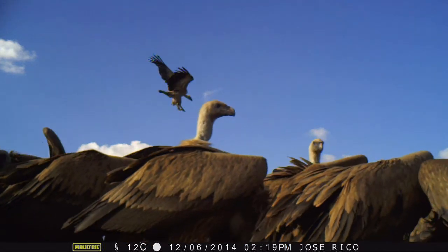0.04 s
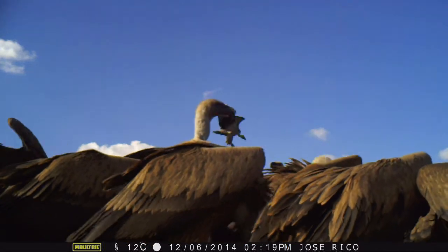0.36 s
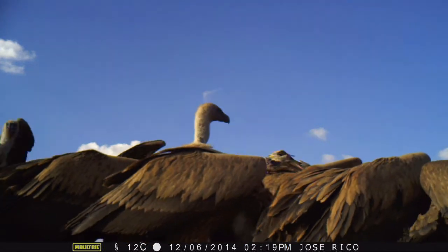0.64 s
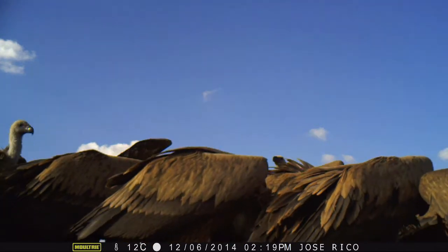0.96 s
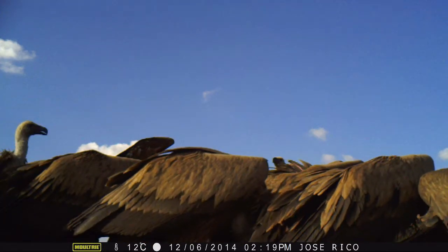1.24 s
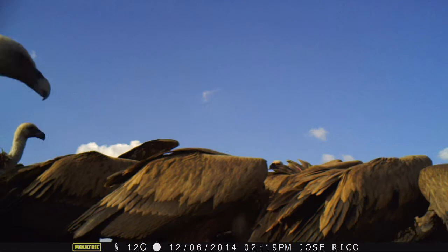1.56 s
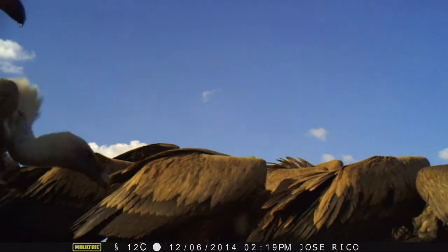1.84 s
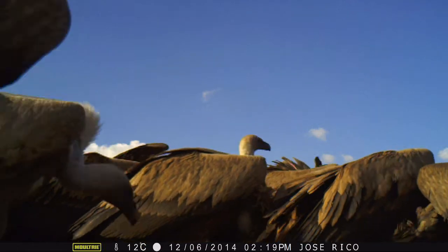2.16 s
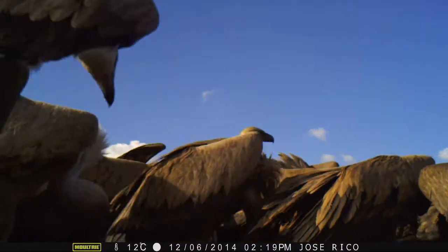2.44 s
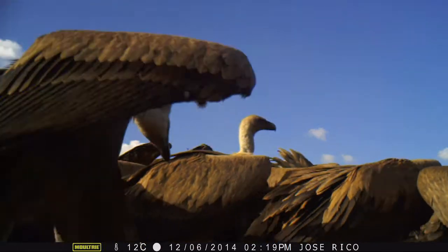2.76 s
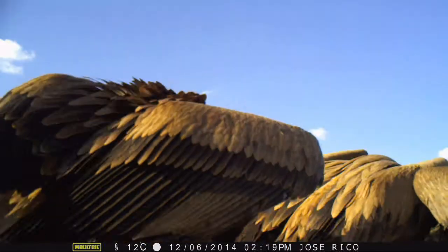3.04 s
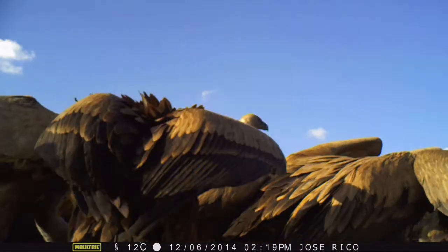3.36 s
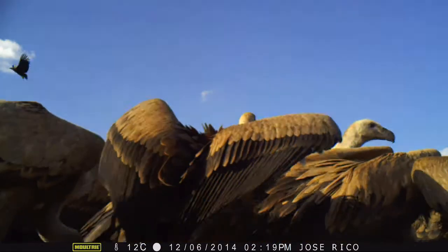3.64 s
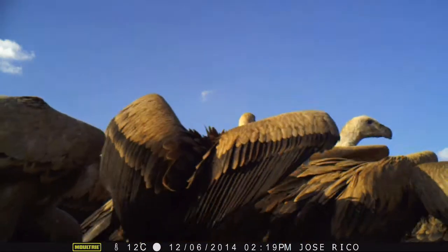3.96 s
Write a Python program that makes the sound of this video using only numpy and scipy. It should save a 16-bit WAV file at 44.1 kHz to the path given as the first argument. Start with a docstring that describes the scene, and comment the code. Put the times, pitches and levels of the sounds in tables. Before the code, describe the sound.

A vulture cackles harshly about ten times in quick succession, close to the microphone outdoors. Afterwards, jostling birds leave only faint feather rustles, scattered ticks, knocks and soft bumps over a low hiss and light wind.

```python
"""A vulture in a feeding crowd gives a quick run of ten harsh cackles close to a trail camera.
In each, a pulsing source drives the resonances of the throat: a short chip, a catch,
then a falling rasp that sometimes locks into a whistle. Afterwards the jostling is left:
feathers rustle by friction, quills tick, beaks and claws knock, and bodies bump.
Hiss and low wind lie under it all, and the camera's coarse sampling mirrors it into the treble."""
import sys
import numpy as np
from scipy import signal
from scipy.io import wavfile
from scipy.ndimage import uniform_filter1d, map_coordinates

SR = 44100
rng = np.random.default_rng(int(sys.argv[2]) if len(sys.argv) > 2 else 0)


def digitize_waveform(pressure):
    """Quantize a signal to 16-bit integers and store it at the path in sys.argv[1].

    Rows of a 2-D input are taken as channels; values are limited to [-1, 1].
    """
    field = np.atleast_2d(pressure).T
    bounded = np.clip(field, -1, 1)
    quanta = np.round(bounded * 32767).astype(np.int16)
    wavfile.write(sys.argv[1], SR, quanta)


N = 176400


def vulture():
    """Source and filter: each chip and rasp takes a fixed colour; the rasp yields partly to whistles."""
    # Calls: start_s, chip_s, chip_db, rasp_delay_s, rasp_s, rasp_db, throat_hz, pulse_hz
    cackles = [(-.016, 0.013, -11.5, 0.019, 0.032, -19, 1638, 281.4),
               (.057, 0.011, -16, 0.011, 0.034, -17, 1570, 286.3),
               (0.1357, 0.011, -14.5, 0.016, .035, -16, 1789, 331.5),
               (0.2136, .009, -13, 0.011, 0.038, -15, 1778, 295.2),
               (0.3015, 0.0064, -15, .0135, .03, -11, 1784, 317.4),
               (0.383, 0.0112, -14, .0155, 0.038, -20.5, 1678, 322),
               (0.4696, 0.0096, -14, .0145, 0.0288, -16.5, 1732, 316),
               (0.5566, 0.011, -16, 0.016, .03, -17, 1735, 320),
               (.647, .007, -17, 0.012, .038, -12.5, 1815, 315.8),
               (0.746, 0.006, -17, 0.012, 0.042, -14.5, 1695, 328)]
    # Course of a chip and of a rasp: share_of_length, gain_db, tuning_ratio
    chip_shape = [(0, -1, .8), (0.999, 0, 0.92)]
    rasp_shape = [(0, -2.5, 1.063), (.12, 0.5, 1.08), (.56, -2, .93), (.75, -6.5, .92), (1, -20, .88)]
    # Fixed tone colour of the calls, with the ring of camera case and microphone: frequency_hz, gain_db
    call_colour = [(200, -16.5), (480, 0.5), (650, -4.5), (800, 3.5), (920, -9.5), (1060, 1), (1300, 3.5),
                   (1700, 4), (2050, 2), (2330, 7), (2600, -11), (3100, 6.5), (3900, 2)]
    # The voice locks onto one tone: start_s, length_s, level_db, pitch_hz
    whistles = [(0.081, 0.0074, -14.5, 1690), (0.158, 0.029, -17.5, 1741), (0.229, 0.013, -7.5, 1880),
                (0.669, 0.025, -6.5, 1751)]
    chip_pulse_hz, lock_share = 510, 0.25
    voice, voice_share, tones = np.zeros(N), np.ones(N), np.zeros(N)
    for start_s, chip_s, chip_db, rasp_delay_s, rasp_s, rasp_db, throat_hz, pulse_hz in cackles:
        add(voice, start_s, syllable(chip_s, chip_db, throat_hz, chip_pulse_hz, chip_shape))
        add(voice, start_s + rasp_delay_s, syllable(rasp_s, rasp_db, throat_hz, pulse_hz, rasp_shape))
    for start_s, length_s, level_db, pitch_hz in whistles:
        add(tones, start_s, whistle(length_s, level_db, pitch_hz))
        add(voice_share, start_s, -lock_share * np.hanning(round(length_s * SR)))
    return colour(voice, call_colour) * voice_share + tones


def syllable(length_s, level_db, throat_hz, pulse_hz, shape):
    """Forced resonance: uneven pulses and puffs of air drive the gliding throat, while two tones beat."""
    # Throat resonances: tuning_ratio, width_hz, gain_db
    formants = [(1.021, 374, 4), (1.267, 350, -4), (0.721, 333, 1)]
    jitter, wobble, wobble_hz, uneven_db = 0.13, 0.045, 300, 2
    breath_share, squeal_share, throb_depth = 0.18, 0.55, 0.33
    attack_s, release_s, limit_over_rms = 0.00053, 0.0025, 1.12
    count = 3072
    t = np.arange(count) / SR
    share, gain_db, tuning = np.transpose(shape)
    progress = np.minimum(t / length_s, 1)
    cycles = np.cumsum(pulse_hz * np.exp(jitter * drift(count, pulse_hz))) / SR
    pulses = np.diff(np.floor(cycles), prepend=-1)
    puffs = np.exp(-2 * (cycles % 1)) * rng.standard_normal(count)
    drive = (1 - breath_share) * unit(pulses) + breath_share * unit(puffs)
    hz = throat_hz * np.interp(progress, share, tuning) * np.exp(wobble * drift(count, wobble_hz))
    rasp = sum(amp(db) * resonate_twice(drive, hz * ratio, width) for ratio, width, db in formants)
    phase = 2 * np.pi * np.cumsum(hz) / SR
    squeal = np.sin(phase) + 0.55 * np.sin(phase + 2 * np.pi * cycles)  # one pulse rate apart
    voice = (1 - squeal_share) * unit(rasp) + squeal_share * unit(squeal)
    voice /= np.sqrt(uniform_filter1d(voice ** 2, size=300) + 1e-12)  # running rms of 1
    saturated = limit_over_rms * np.tanh(voice / limit_over_rms)
    throb = 1 + throb_depth * np.cos(2 * np.pi * cycles)
    envelope = np.minimum(t / attack_s, 1) * np.exp(-np.maximum(t - length_s, 0) / release_s)
    course_db = level_db + np.interp(progress, share, gain_db) + uneven_db * drift(count, pulse_hz)
    return saturated * throb * envelope * amp(course_db)


def whistle(length_s, level_db, pitch_hz):
    """Oscillation at a single frequency: a clean tone swells and fades as its pitch sags."""
    sag_hz_per_s, waver = 870, 0.0042
    t = np.arange(0, length_s, 1 / SR)
    hz = (pitch_hz - sag_hz_per_s * (t - length_s / 2)) * (1 + waver * drift(len(t), hz=300))
    swell = np.sqrt(2) * amp(level_db) * np.sin(np.pi * t / length_s)
    return swell * np.sin(2 * np.pi * np.cumsum(hz) / SR)


def knocks():
    """Impact excitation: beaks and claws give a dull ring, the woody ring of the case and a dry crack."""
    # Strikes: start_s, peak_db, scrape_decay_s, ring_hz
    strikes = [(.285, -24, 0.00065, 1080), (1.238, -24, 0.00037, 1370), (1.315, -25.5, .006, 1070),
               (1.568, -13.5, 0.0011, 940), (1.617, -28.5, 0.0053, 1110), (2.227, -23, 0.00099, 1480),
               (2.441, -25, 0.0011, 1300), (2.839, -25.5, .001, 1100), (3.015, -27, 0.00077, 1420),
               (3.428, -21.5, 0.0018, 1410), (3.445, -29, 0.0043, 1400), (3.501, -24, 0.0017, 1550),
               (3.621, -23, 0.0019, 1180), (3.639, -24.5, 0.0013, 1100), (3.696, -27.5, 0.0015, 1450),
               (3.826, -21, 0.0015, 1140)]
    width_hz, case_db, crack_db = 610, 3, -7
    out = np.zeros(N)
    for start_s, peak_db, scrape_decay_s, ring_hz in strikes:
        touch = contact(scrape_decay_s)
        ring = unit(resonate_twice(touch, ring_hz, width_hz))
        crack = resonate(touch, ring_hz, 2 * width_hz)
        knock = ring + amp(case_db) * unit(camera_case(crack)) + amp(crack_db) * unit(crack)
        add(out, start_s, amp(peak_db) * knock / abs(knock).max())
    bass_cut = signal.butter(2, 640, "high", fs=SR, output="sos")  # small hard parts give no bass
    return signal.sosfilt(bass_cut, out)


def ticks():
    """Damped free vibration: stiff quills flick past each other, ring briefly and excite the case."""
    # Quill flicks: start_s, level_db, ring_hz, scrape_decay_s
    flicks = [(0.377, -23, 2140, .004), (0.802, -21.5, 2350, 0.0028), (0.848, -24, 2680, 0.0013),
              (1.062, -30, 2770, 0.0015), (1.114, -34.5, 2180, 0.0012), (1.237, -16.5, 3090, 0.0016),
              (1.479, -29, 2220, 0.0069), (1.562, -21.5, 2320, 0.0023), (1.838, -23.5, 2870, .002),
              (1.96, -28.5, 2900, 0.004), (2.057, -25.5, 2500, 0.0014), (2.288, -28, 2900, 0.0093),
              (2.326, -22, 2870, 0.0026), (2.659, -27, 2260, 0.003), (3.353, -19.5, 2360, 0.0014),
              (3.375, -19.5, 2260, 0.00096)]
    # Tone colour of the ticks: frequency_hz, gain_db
    response = [(100, -23), (500, 6), (900, 3.5), (3000, 0.5), (3400, -7), (3900, -13.5)]
    width_hz, case_db = 560, -2.5
    out = np.zeros(N)
    for start_s, level_db, ring_hz, scrape_decay_s in flicks:
        touch = contact(scrape_decay_s)
        ring = unit(resonate_twice(touch, ring_hz, width_hz))
        case_ring = unit(camera_case(resonate(touch, ring_hz, 2 * width_hz)))
        tick = ring + amp(case_db) * case_ring
        add(out, start_s, amp(level_db) * tick / abs(tick).max())
    return colour(out, response)


def contact(decay_s):
    """Contact force: the impulse of a sharp touch, then the friction noise of a brief scrape."""
    scrape_db = 0.5
    t = np.arange(SR // 16) / SR
    impulse = 1.0 * (t == 0)
    scrape = rng.standard_normal(len(t)) * np.exp(-t / decay_s) * np.minimum(t / decay_s, 1)
    return unit(impulse) + amp(scrape_db) * unit(scrape)


def camera_case(x):
    """Modal superposition: the small resonances of the case add with alternating sign."""
    # Case modes: frequency_hz, width_hz, gain_db
    modes = [(793, 91, -4), (1047, 82, 8.5), (1366, 176, 6), (1570, 190, 5), (2308, 156, 5),
             (2900, 160, -28)]
    return sum((-1) ** k * amp(db) * resonate(x, hz, width) for k, (hz, width, db) in enumerate(modes))


def thumps():
    """Soft impact: bodies and wings bump, each a low pressure pulse of a few cycles."""
    # Bumps: centre_s, peak_db, pitch_hz, fall_s
    bumps = [(1.494, -19.5, 99, 0.0067), (2.444, -25, 109, 0.0059), (3.448, -27.5, 90, 0.0087),
             (3.54, -34, 109, 0.055), (3.755, -36, 32.4, 0.071)]
    rise_over_fall = 0.45
    out, t = np.zeros(N), np.arange(N) / SR
    for centre_s, peak_db, pitch_hz, fall_s in bumps:
        age = t - centre_s
        scale_s = np.where(age < 0, rise_over_fall * fall_s, fall_s)
        envelope = np.exp(1 - np.hypot(1, age / scale_s))
        out += amp(peak_db) * envelope * np.cos(2 * np.pi * pitch_hz * age)
    return out


def rustle():
    """Friction noise: soft plumage, with small snaps in it, and brighter quills rub as the birds jostle."""
    # Strength of the jostling: time_s, level_db
    jostling = [(0, -43.5), (0.999, -47.5), (1.1, -42), (1.4, -45.5), (1.5, -44), (1.68, -45), (2.0, -47),
                (2.2, -42), (2.35, -44), (2.46, -40), (2.58, -42.5), (2.72, -42.5), (3.0, -41.5),
                (3.15, -49.5), (3.33, -46.5), (3.44, -35.5), (3.6, -42), (3.8, -45.5), (3.88, -45),
                (3.97, -40.5)]
    snaps_per_s, snap_db, quill_db, trim_db = 20, -9.5, -15, -2
    snaps = unit(rng.uniform(-0.56, 1, N) * (rng.random(N) < snaps_per_s / SR))
    plumage = unit(camera_case(unit(crackles(clump_db=2.5)) + amp(snap_db) * snaps))
    quills = unit(resonate_twice(crackles(clump_db=5), hz=2900, width_hz=530))
    level_db = trim_db + np.interp(np.arange(N) / SR, *np.transpose(jostling))
    return (plumage + amp(quill_db) * quills) * amp(level_db)


def brushes():
    """Sliding friction: a band of crackles swells and fades as wing passes over wing."""
    # Wing strokes: start_s, length_s, level_db, centre_hz, width_hz
    strokes = [(1.856, 0.28, -49.5, 2600, 700), (2.399, 0.072, -44.5, 2640, 800),
               (2.978, 0.068, -48, 1310, 1210), (3.378, .05, -43.5, 2600, 800),
               (3.412, .18, -48, 517, 1000), (3.399, 0.87, -47.5, 1370, 795)]
    out = np.zeros(N)
    for start_s, length_s, level_db, centre_hz, width_hz in strokes:
        swell = np.hanning(round(length_s * SR))
        slips = crackles(clump_db=3.5)[:len(swell)]
        add(out, start_s, amp(level_db) * swell * unit(resonate_twice(slips, centre_hz, width_hz)))
    return out


def crackles(clump_db):
    """Shot noise: feather barbs slip at random instants, louder and softer in clumps."""
    slips_per_s, spread_db, clump_hz = 3500, 4.5, 40.72
    sizes = amp(spread_db * np.minimum(rng.exponential(1, N), 5)) * rng.choice([-1, 1], N)
    slipping = rng.random(N) < slips_per_s / SR
    return sizes * slipping * amp(clump_db * drift(N, clump_hz))


def scatter(x):
    """Scattering: the ground and the other birds return a short, weak tail of reflections."""
    echo_db, t60_s = -24, 0.097
    t = np.arange(SR // 4) / SR
    tail = rng.standard_normal(len(t)) * amp(-60 * t / t60_s)
    return x + amp(echo_db) * signal.fftconvolve(x, tail / np.linalg.norm(tail))[:N]


def air():
    """Broadband ambient noise: a steady outdoor hiss and a low wind modulated by gusts."""
    # Spectra of hiss and wind: frequency_hz, relative_density_db
    hiss_spectrum = [(20, -1.5), (102, -1), (142, -7.5), (315, -15.5), (683, -19.5), (909, -24.5),
                     (1250, -18.5), (1600, -16.5), (1930, -24.5), (2500, -22), (3130, -27), (3900, -30.5),
                     (5000, -62)]
    wind_spectrum = [(20, -22.5), (45, -8), (105, -1.5), (170, -8), (300, -39), (900, -70.5)]
    hiss_db, wind_db, gust_db = -43, -44.5, 1.5
    hiss = unit(colour(rng.standard_normal(N), hiss_spectrum))
    wind = unit(colour(rng.standard_normal(N), wind_spectrum) * amp(gust_db * drift(N, hz=7.5)))
    return amp(hiss_db) * hiss + amp(wind_db) * wind


def resonate(x, hz, width_hz):
    """A damped resonator of gain 1, tuned to a fixed or gliding frequency."""
    rotation = np.exp(2j * np.pi * np.cumsum(hz * np.ones(len(x))) / SR)
    pole = np.exp(-np.pi * width_hz / SR)
    return 2 * (rotation * signal.lfilter([1 - pole], [1, -pole], x / rotation + 1e-18)).real


def resonate_twice(x, hz, width_hz):
    """Two equal resonators in cascade give steeper skirts."""
    return resonate(resonate(x, hz, width_hz), hz, width_hz)


def colour(x, points):
    """Minimum-phase filtering through points of frequency_hz, gain_db."""
    frequency_hz, gain_db = np.transpose(points)
    size = 4096
    bin_hz = abs(np.fft.fftfreq(size, 1 / SR))
    log_gain = np.log(amp(np.interp(np.log(bin_hz + 1), np.log(frequency_hz + 1), gain_db)))
    taps = np.fft.ifft(np.exp(np.conj(signal.hilbert(log_gain)))).real
    return signal.fftconvolve(x, taps[:size // 2])[:len(x)]


def drift(count, hz):
    """Random modulation of rms 1, with hz new values a second."""
    position = np.arange(count) * hz / SR
    return unit(np.interp(position, np.arange(512), rng.standard_normal(512)))


def amp(db):
    """Decibels as an amplitude ratio."""
    return 10 ** (np.asarray(db) / 20)


def unit(x):
    """Normalisation to an rms of 1."""
    return x / np.sqrt(np.mean(x ** 2) + 1e-20)


def add(mix, start_s, sound):
    """Superposition: a sound joins the mix at start_s."""
    at = round(start_s * SR)
    sound = sound[max(-at, 0):]
    part = mix[max(at, 0):][:len(sound)]
    part += sound[:len(part)]


def scene():
    """All sources sum in one channel; the calls, ticks and knocks carry reflections."""
    return (scatter(vulture() + ticks() + knocks()) + rustle() + brushes() + thumps() + air())[None]


def record(dry):
    """Spectral imaging: the camera joins coarse samples by lines, mirroring the sound into the treble."""
    camera_rate_hz, edge_hz, ceiling = 8000, 15900, 0.95
    t, sample_times = np.arange(N) / SR, np.arange(0, N / SR, 1 / camera_rate_hz)
    band = signal.fftconvolve(dry[0], signal.firwin(129, camera_rate_hz / 2, fs=SR), "same")
    samples = map_coordinates(band, [sample_times * SR], order=3, mode="nearest")
    soft_clipped = samples / (1 + (samples / ceiling) ** 8) ** (1 / 8)
    joined = np.interp(t, sample_times, soft_clipped)
    treble_cut = signal.firwin(511, edge_hz, window=("kaiser", 9), fs=SR)
    return signal.fftconvolve(joined, treble_cut, "same")[None]


dry = scene()
out = record(dry)
digitize_waveform(out)
```